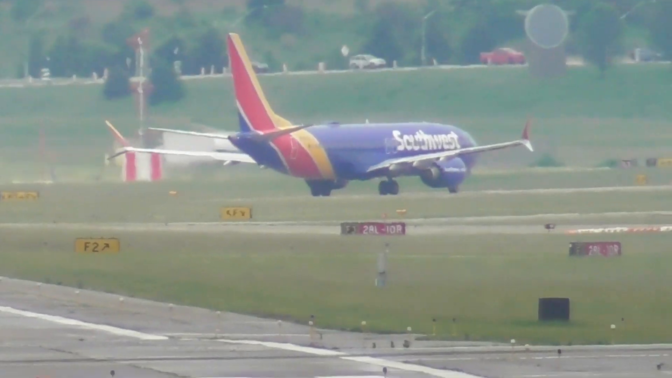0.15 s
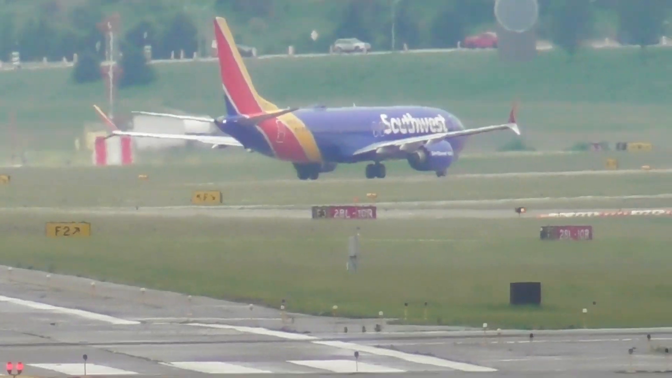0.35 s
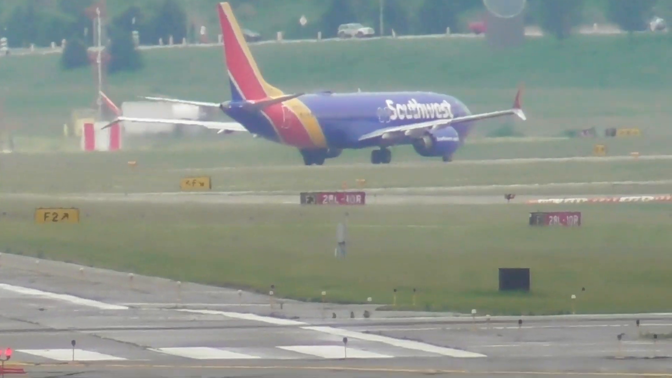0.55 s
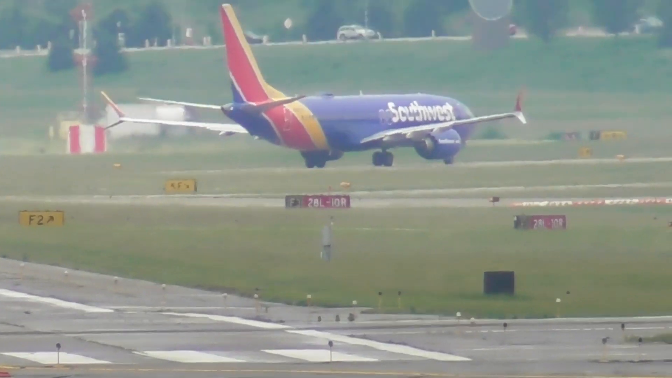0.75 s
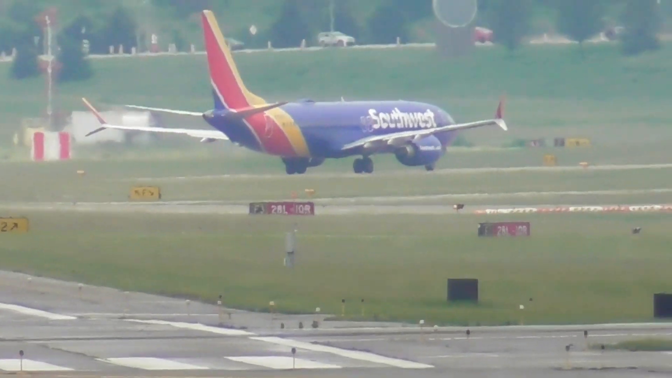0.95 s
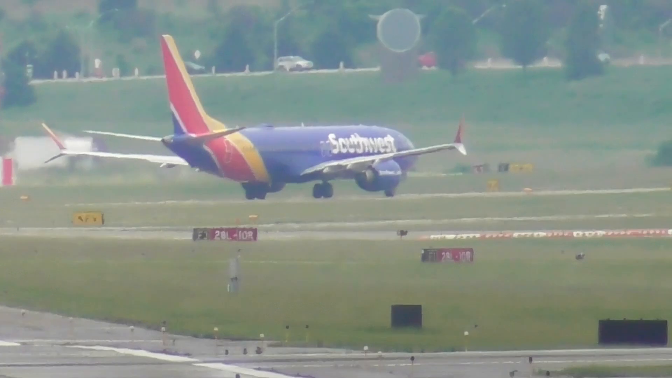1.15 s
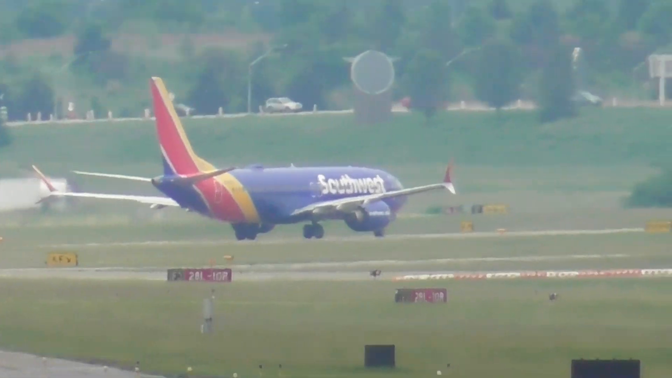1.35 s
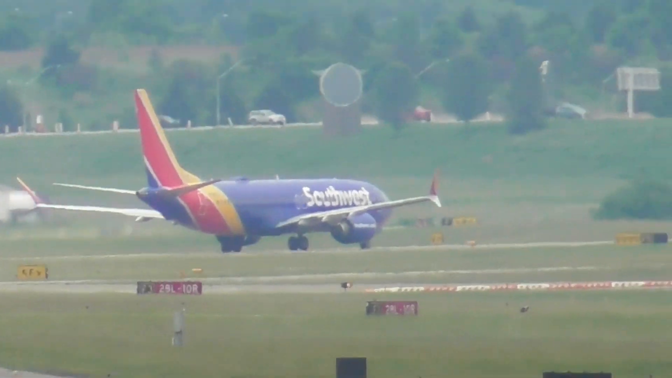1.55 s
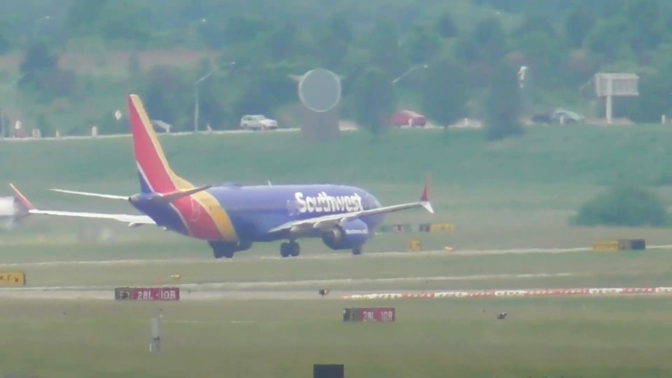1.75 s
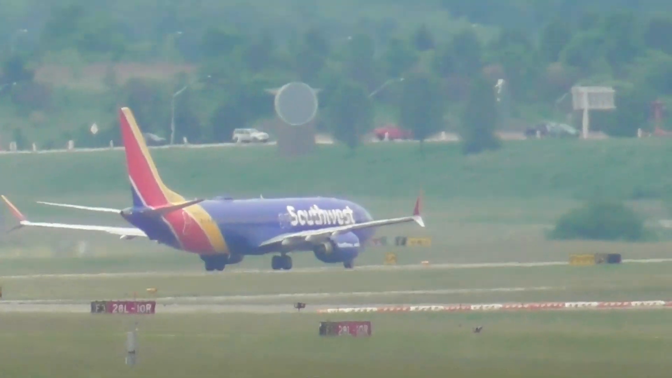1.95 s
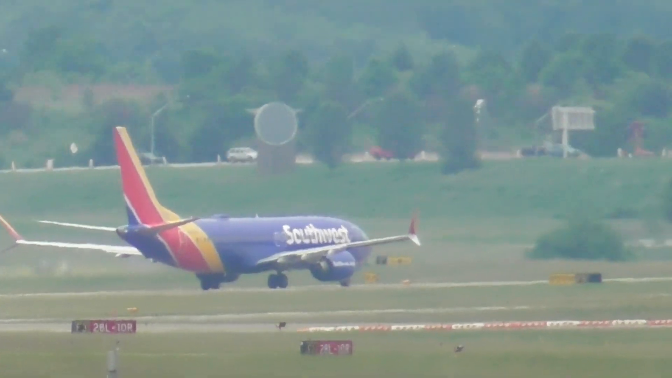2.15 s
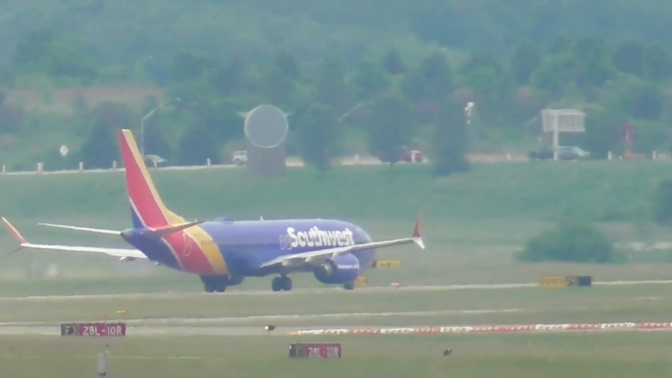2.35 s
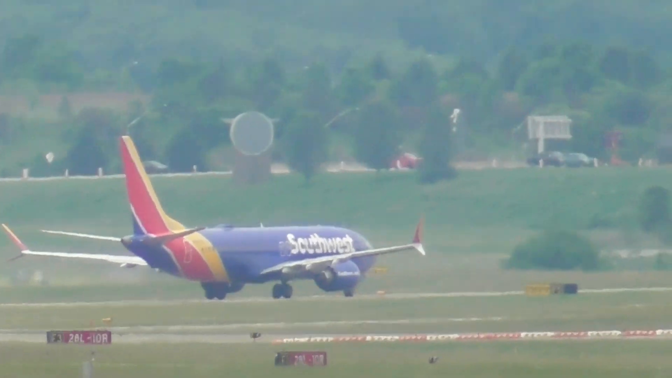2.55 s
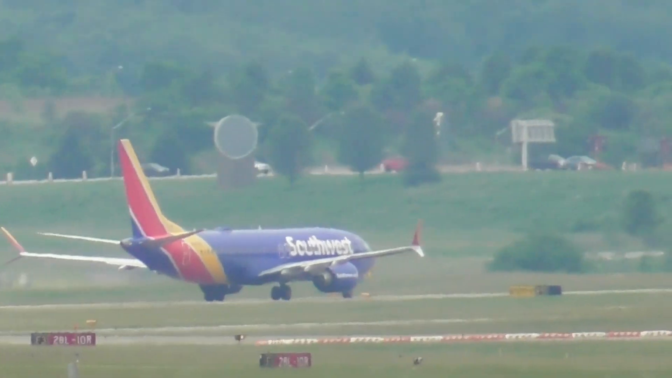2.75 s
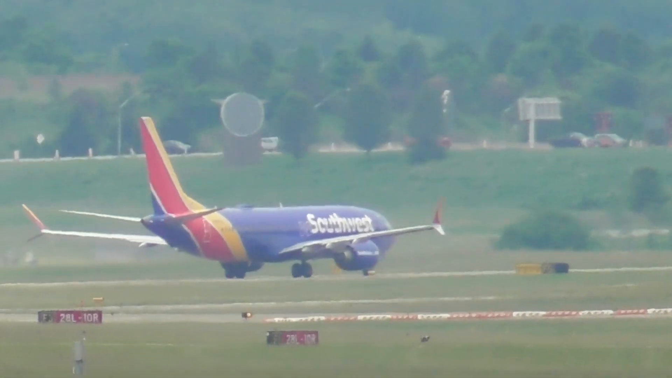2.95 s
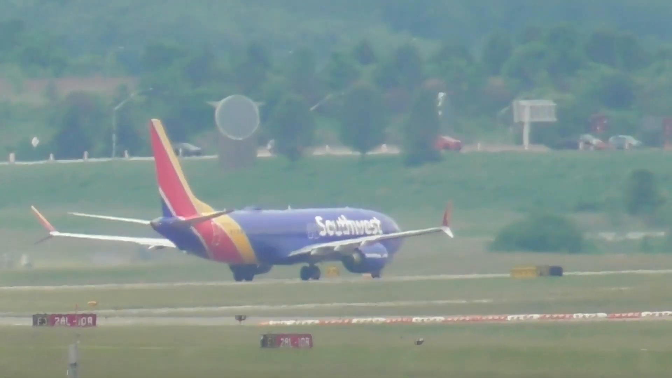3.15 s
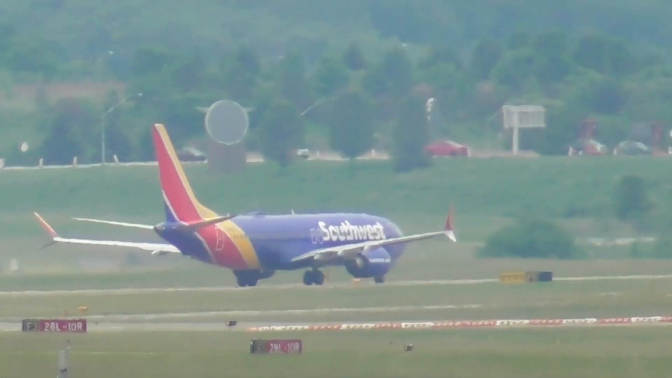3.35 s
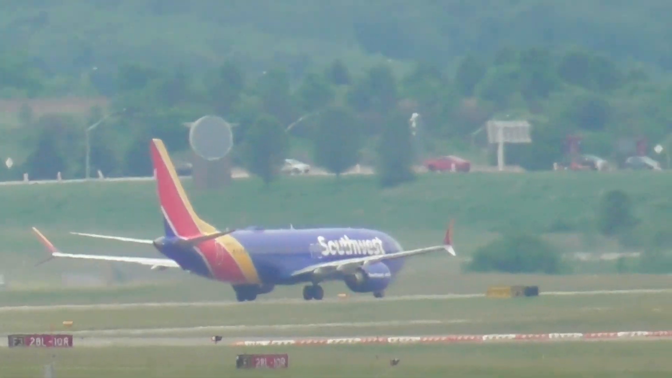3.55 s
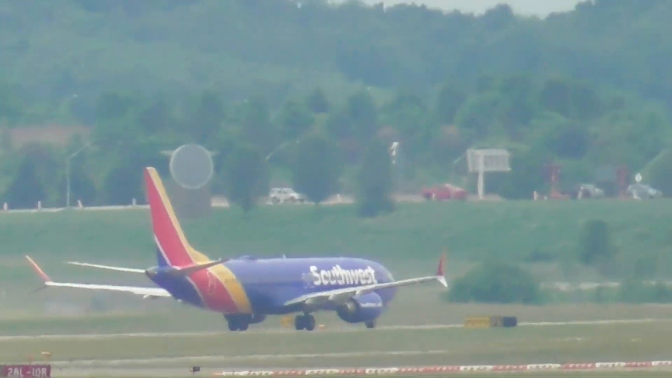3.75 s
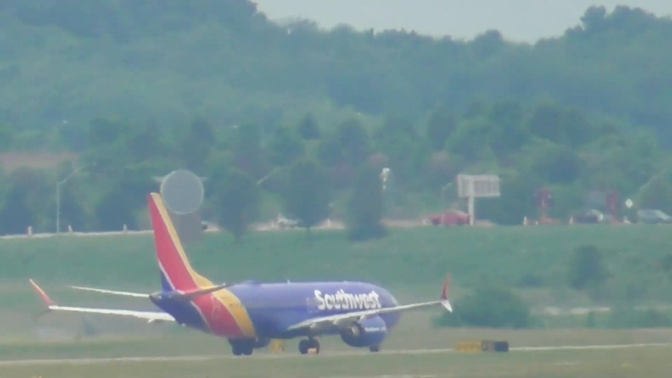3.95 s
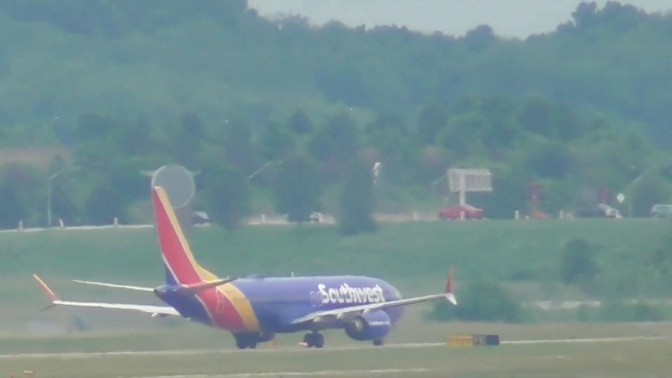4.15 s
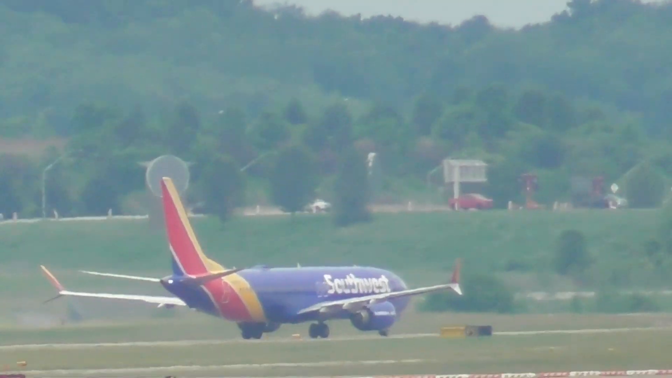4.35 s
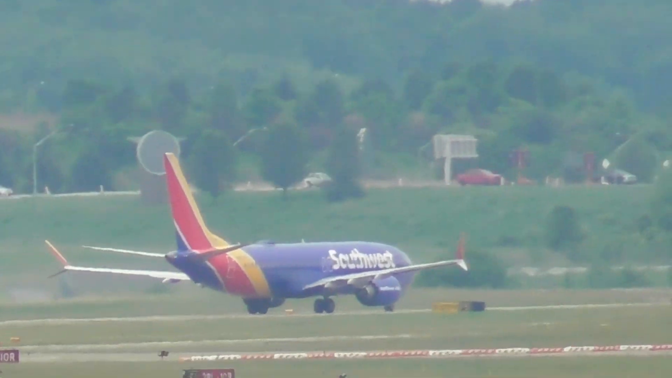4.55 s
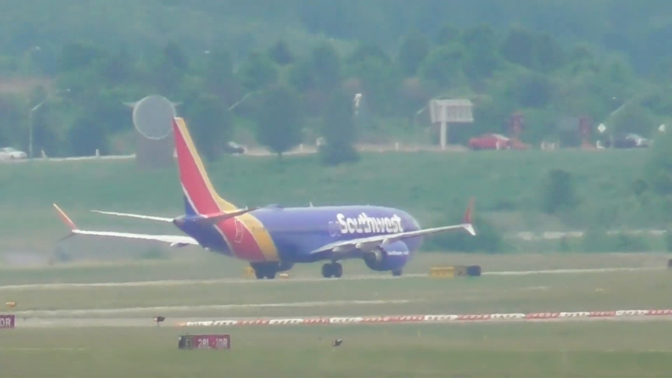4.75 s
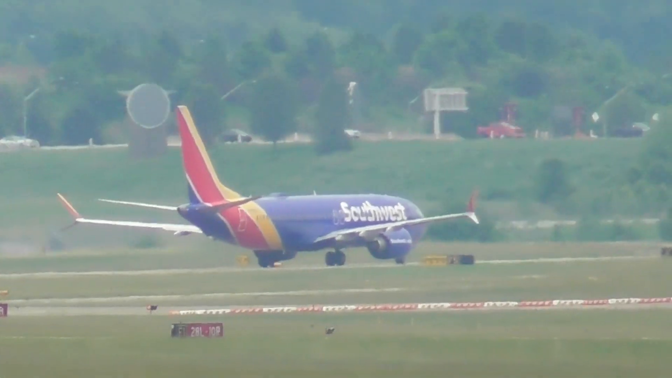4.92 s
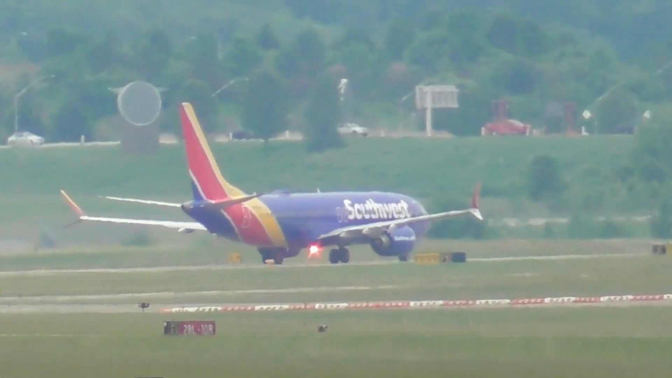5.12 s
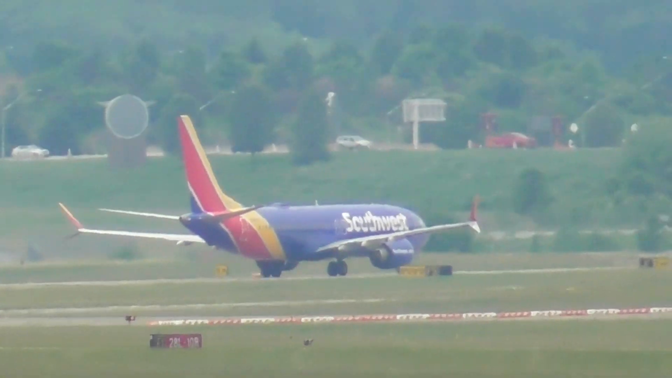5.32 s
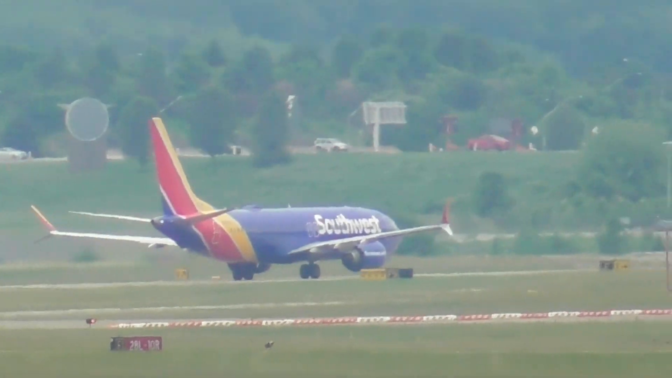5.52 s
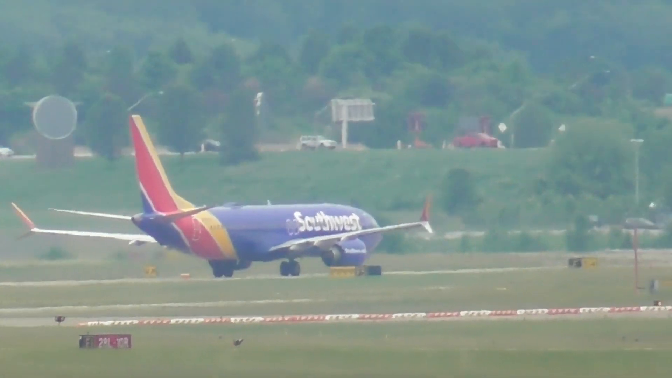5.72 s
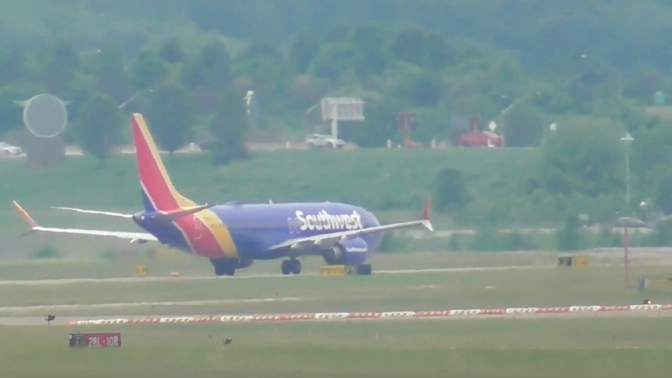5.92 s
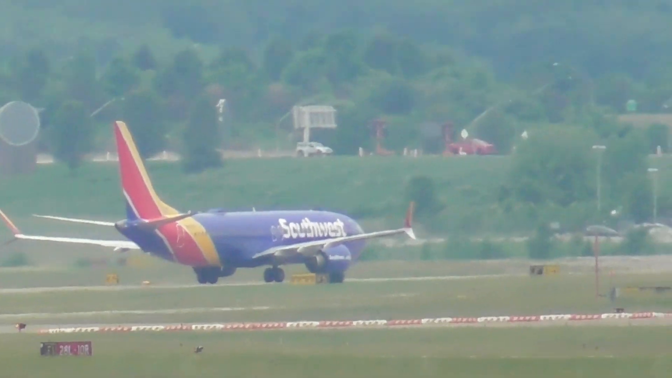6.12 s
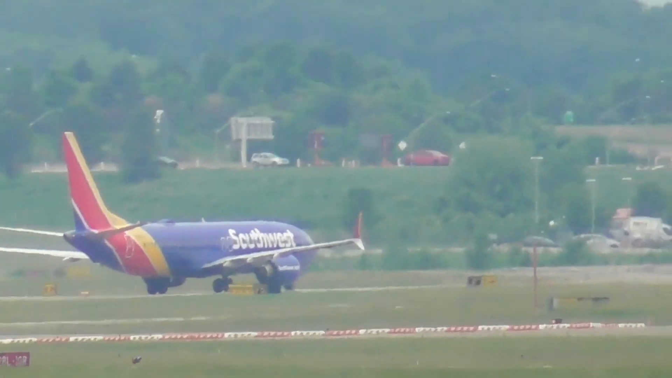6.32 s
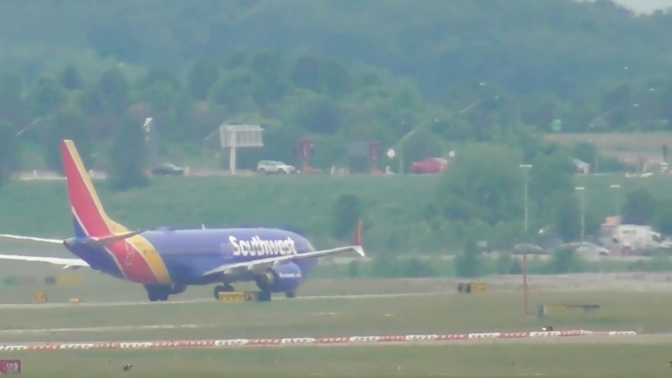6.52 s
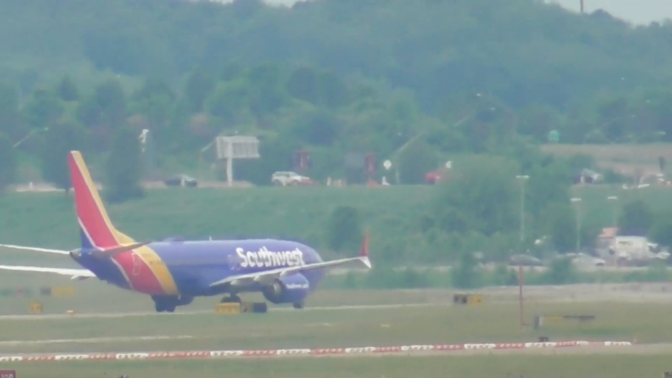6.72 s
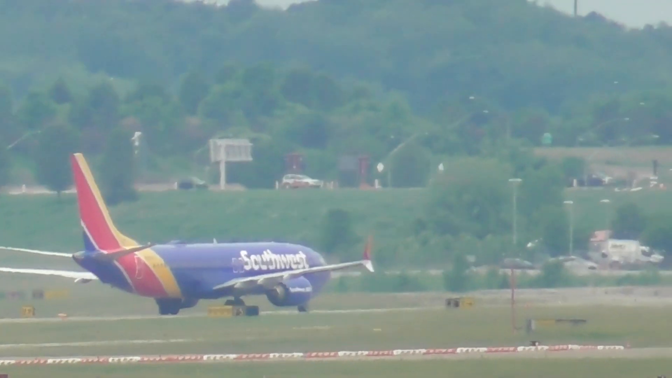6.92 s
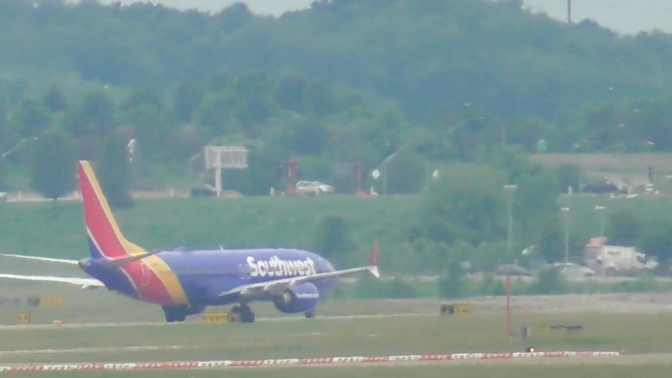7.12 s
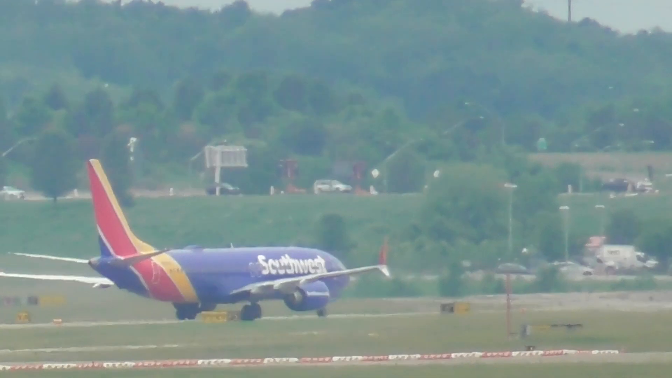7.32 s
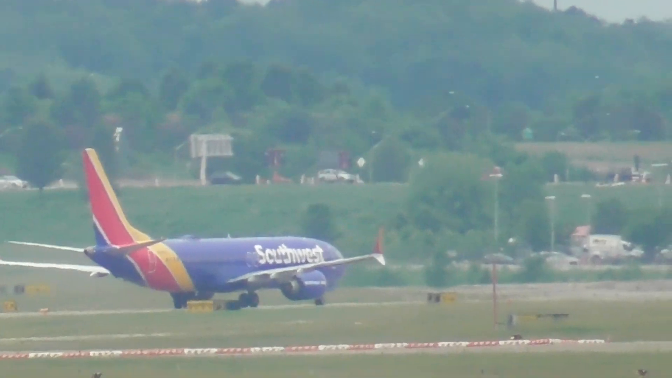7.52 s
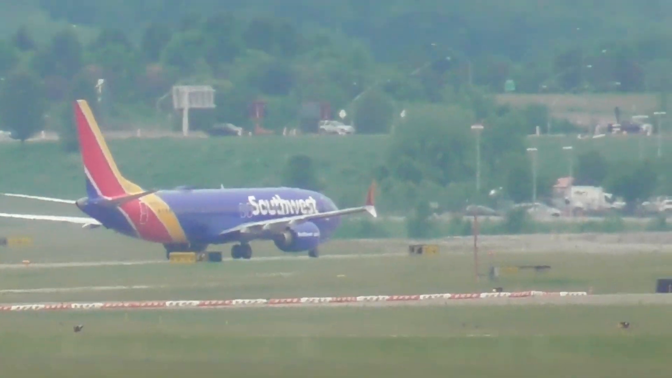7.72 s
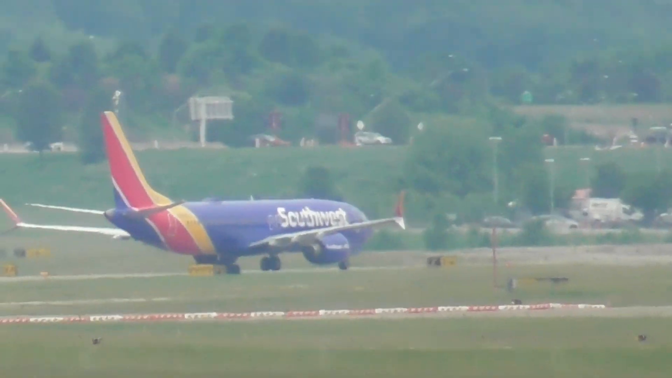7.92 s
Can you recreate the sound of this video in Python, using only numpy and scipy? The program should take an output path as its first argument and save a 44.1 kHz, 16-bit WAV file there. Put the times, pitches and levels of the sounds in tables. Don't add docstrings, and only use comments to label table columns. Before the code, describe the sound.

Handheld stereo camera in grass, far from a runway. A dull airfield hum and muffled jet rumble lie under a fast, bright cricket trill. Faint birds whistle, one button tick sounds near the start, and light grass rustle rises after three seconds. Harsh little bird rasps follow, then the engines' reversed exhaust swells to a wide, rushing roar that covers nearly everything and barely eases at the end.

```python
import sys
import numpy as np
from scipy import signal
from scipy.fft import rfft, irfft, next_fast_len
from scipy.io import wavfile
from scipy.ndimage import uniform_filter1d

SR = 44100
rng = np.random.default_rng(int(sys.argv[2]) if len(sys.argv) > 2 else 0)


def ratio_of_db(decibels):
    return 10 ** (np.asarray(decibels, float) / 20)


def log_audio(samples):
    frames = np.atleast_2d(samples).T
    limited = np.clip(frames, -1, 1)
    pcm = np.round(limited * 32767).astype(np.int16)
    wavfile.write(sys.argv[1], SR, pcm)


N = 351459
SECONDS = np.arange(N) / SR
OPPOSITE = np.array([[1], [-1]])


def level(x, db):
    return x * ratio_of_db(db) / np.sqrt(np.mean(x ** 2))


def on_log(hz, table_hz, values):
    return np.interp(np.log(hz + 1), np.log(table_hz), values)


def ramp(hz, low_hz, high_hz):
    return on_log(hz, [low_hz, high_hz], [0, 1])[:, None]


def step(t, at_s, width_s):
    return (1 + np.tanh((t - at_s) / width_s / 2)) / 2


def coloured(spectrum):
    hz, db = np.transpose(spectrum)
    size = next_fast_len(N)
    white = rfft(rng.standard_normal(size))
    gain = ratio_of_db(on_log(np.fft.rfftfreq(size, 1 / SR), hz, db))
    return level(irfft(white * gain, size)[:N], 0)


def walk(rate, count=N, per_s=SR):
    hold = max(int(per_s / rate), 1)
    held = np.repeat(rng.standard_normal(count // hold + 1), hold)
    smooth = uniform_filter1d(uniform_filter1d(held, hold), hold)[:count]
    return smooth / smooth.std()


def tone(hz):
    return np.sin(2 * np.pi * np.cumsum(hz) / SR)


# pitch in Hz, left minus right in dB facing the runway, the same turned away in dB, how far left leads in
LEFT_RIGHT_DIFFERENCES = [(70, 12, 11, -0.5, 0.83), (153, 11.5, 15.4, -0.6, 0.92), (304, 7, 14.4, -1.06, .95),
                          (600, 4.5, 13, -0.73, 0.95), (1130, -1.5, 12.4, -1.14, 0.91),
                          (2200, -6, 7.8, 0.22, 0.92), (3300, -0.5, 7.1, 0.1, 0.92), (4600, -7, 1.3, 0.46, 1),
                          (7300, -1, 0.3, -0.27, 0.99), (9000, -1, 0.5, 2, 0.84), (10900, 3, .3, 2.5, 1),
                          (12600, -2, .2, 4, 1), (15000, 0.2, .2, 3.14, .97)]


def far_noise(spectrum, gain_db, turned, patchy_db):
    window = 1024
    hz, s, direct = signal.stft(coloured(spectrum), SR, nperseg=window)
    scattered = signal.stft(coloured(spectrum), SR, nperseg=window)[2]

    centres_hz = np.geomspace(60, 12000, num=12)
    patches = np.array([walk(5.0, count=len(s), per_s=SR / 512) for _ in centres_hz])
    patches = np.array([on_log(hz, centres_hz, moment) for moment in patches.T]).T
    gain = ratio_of_db(gain_db(hz, s) + patchy_db * patches)

    port_hz, *columns = np.transpose(LEFT_RIGHT_DIFFERENCES)
    facing_db, away_db, lead, like = (on_log(hz, port_hz, column)[:, None] for column in columns)
    tilt = ratio_of_db(facing_db + turned(s) * (away_db - facing_db))
    like = np.clip(like, 0, 1)
    left = direct * np.exp(1j * lead) * tilt / (1 + tilt)
    right = (like * direct + np.sqrt(1 - like ** 2) * scattered) / (1 + tilt)
    return signal.istft(2 * gain * np.array([left, right]), SR, nperseg=window)[1][:, :N]


# pitch in Hz, level in dB per Hz.
HISS_SPECTRUM = [(2000, 3), (3800, 0), (5500, -1), (6400, -5), (8000, -1.5), (11000, -3), (15500, -1)]


def port_hiss():
    hiss_db, duck_from_s, duck_db_per_s = -65, 6.95, -5
    common, apart = coloured(HISS_SPECTRUM), coloured(HISS_SPECTRUM)
    loud_for_s = np.maximum(SECONDS - duck_from_s, 0)
    return ratio_of_db(hiss_db + duck_db_per_s * loud_for_s) * (common + 0.64 * apart * OPPOSITE)


# pitch in Hz, level in dB per Hz.
AIRFIELD_SPECTRUM = [(15, -37), (25, -17), (104, 5), (139, -7), (211, -3.5), (421, -26), (457, -7),
                     (912, -8.5), (1380, -32), (1710, -18), (3700, -33.5), (4810, -17), (8140, -120)]


def airfield():
    return far_noise(AIRFIELD_SPECTRUM, lambda hz, t: -44, lambda t: 0, patchy_db=1.1)


def breeze():
    calm_db, gust_db, gust_s, rise_s = -82, -60.5, 3.15, 0.4
    rustle = coloured([(3800, -35), (5000, -2.0), (6000, 0.0), (7500, -7.0), (9500, -16), (12000, -16)])
    gust = (gust_db - calm_db) * step(SECONDS, gust_s, rise_s)
    return rustle * ratio_of_db(calm_db + gust + 0.9 * walk(5.1))


# pitch in Hz, level in dB per Hz.
CHORUS_SPECTRUM = [(3500, -40), (4000, -20), (4300, -2.5), (4450, 3.5), (4620, -13), (4750, -11.5),
                   (5100, -37), (5500, -70)]


def cricket_chorus():
    chorus_db, overtone_db, third_db = -49, -14, -15
    apart = 0.26
    above = [(2 * hz, db) for hz, db in CHORUS_SPECTRUM]
    above += [(3 * hz, db + third_db) for hz, db in CHORUS_SPECTRUM[1:]]
    overtones = coloured(above) + apart * coloured(above) * OPPOSITE
    return ratio_of_db(chorus_db) * coloured(CHORUS_SPECTRUM) + ratio_of_db(chorus_db + overtone_db) * overtones


# wing strokes per second, share of a stroke cycle gone at the start,
# pitch in Hz as a stroke begins, level in dB, left minus right of the octave in dB.
CRICKET_SINGERS = [
    (30.8, .92, 4510, -42, -10),
    (30.6, .4, 4480, -54, -6),
    (31.2, .6, 4495, -58, -6),
    (29.7, .1, 4470, -59, 2),
]


def crickets():
    out = np.zeros((2, N))
    for rate, start, hz, db, pan_db in CRICKET_SINGERS:
        cycle = start + np.cumsum(rate * (1 + .002 * walk(3.0))) / SR
        stroke = np.minimum(cycle % 1 / .6, 1)
        pitch_chance, level_chance = rng.standard_normal((300, 2))[cycle.astype(int)].T
        fall = (1 - np.cos(np.pi * stroke)) / 2
        bend = 1 - .06 * fall + .003 * pitch_chance + .004 * walk(700)
        phase = 2 * np.pi * np.cumsum(hz * bend) / SR
        push = ratio_of_db(db + 1.2 * level_chance + 1.6 * walk(300)) * np.sin(np.pi * stroke ** .75) ** .6

        main = ratio_of_db(-7 * fall - 1.5 * OPPOSITE) * np.sin(phase)
        right_shift = np.array([[0], [6 * rng.random()]])
        octave = ratio_of_db(-10 - 7 * fall + pan_db * OPPOSITE / 2) * np.sin(2 * phase + right_shift)
        twelfth = ratio_of_db(-26 - 10 * fall) * np.sin(3 * phase) * np.array([[1.8], [.15]])
        out += push * (main + octave + twelfth)
    return out


# start in seconds, length in seconds, first pitch in Hz, last pitch in Hz,
# level in dB.
STRAIGHT_WHISTLES = [(.11, .02, 3700, 3100, -68), (.235, .044, 3200, 2700, -61),
                     (.445, .03, 3400, 2750, -61), (.6, .03, 3570, 2920, -72), (.8, .07, 2100, 2430, -63),
                     (1.02, 0.055, 2800, 3300, -64), (1.15, .03, 2200, 2550, -62),
                     (1.29, .04, 3300, 2950, -64), (1.395, .035, 7350, 6300, -74),
                     (2.33, .02, 3300, 2900, -67), (2.347, .03, 2580, 2680, -60),
                     (2.598, .03, 3300, 3600, -63), (2.67, .03, 3600, 3200, -71),
                     (2.845, .07, 7150, 7140, -70), (3.275, .06, 7120, 7080, -68),
                     (3.61, 0.028, 2480, 2440, -56), (4.684, .036, 6100, 7900, -53),
                     (5.64, .065, 3530, 3400, -58)]
# start in seconds, length in seconds, pitch at both ends in Hz,
# pitch in the middle in Hz, level in dB.
BENT_WHISTLES = [
    (.465, .076, 2720, 2580, -56.5),
    (.68, .07, 2360, 2460, -60),
    (0.852, .12, 2290, 3050, -59),
    (1.625, .09, 3000, 4000, -59),
    (2.15, .04, 3300, 3900, -64),
]
# start in seconds, pitch in Hz, level in dB.
RISING_PIPS = [(4.661, 6000, -55), (4.84, 6600, -55), (5.014, 6150, -53), (5.047, 6600, -51),
               (5.18, 6000, -55.5), (5.204, 6200, -48), (5.208, 7250, -62), (5.218, 6850, -63),
               (5.332, 6250, -58), (5.342, 7050, -63), (5.4, 6200, -57), (5.513, 6600, -55),
               (4.84, 3300, -57), (5.21, 3300, -53), (5.3, 3300, -58), (5.36, 3220, -57),
               (5.515, 3250, -55)]


def birds():
    pip_s, pip_rise = .021, 0.021
    calls = []
    for s, length, first, last, db in STRAIGHT_WHISTLES:
        calls.append((s, length, (first + last) / 2, (last - first) / 2, 0, db))
    for s, length, ends, middle, db in BENT_WHISTLES:
        calls.append((s, length, middle, 0, ends - middle, db))
    for s, hz, db in RISING_PIPS:
        calls.append((s, pip_s, hz, hz * pip_rise / 2, 0, db))

    out = np.zeros(N)
    for s, length, middle_hz, slope_hz, bend_hz, db in calls:
        u = np.linspace(-1, 1, int(length * SR))
        swell = np.sqrt(2 * (1 - u ** 2))
        out[int(s * SR):][:len(u)] += ratio_of_db(db) * swell * tone(middle_hz + u * slope_hz + u ** 2 * bend_hz)
    return out * ratio_of_db(2.0 * walk(120.))


# start in seconds, length in seconds, level in dB.
RASP_CALLS = [(.39, .04, -68), (1.09, 0.052, -64), (2.14, .06, -62), (2.28, 0.087, -68),
              (3.957, 0.083, -55), (4.662, 0.11, -50.5), (4.815, 0.09, -51.5), (5.02, .1, -52.5),
              (5.18, 0.088, -51), (5.345, 0.1, -53.5), (5.487, 0.099, -55.5)]


def rasps():
    breath = coloured([(1500, -34), (3300, 3.5), (4800, -12), (6000, 0.5), (7800, 2), (10000, -18),
                       (14000, -30)])
    flutter = ratio_of_db(2.5 * walk(250.))
    swells = np.zeros(N)
    for s, length, db in RASP_CALLS:
        swells += ratio_of_db(db) * np.exp(-((SECONDS - s - length / 2) / (.5 * length)) ** 2)
    return breath * flutter * swells


def click():
    click_s, click_db = .3343, -30
    t = np.arange(400) / SR
    body = np.sin(2 * np.pi * 950 * t) * np.exp(-t / 0.0028)
    snap = rng.standard_normal(400) * np.exp(-t / .0012) * ratio_of_db(-2.5)
    snap = signal.lfilter(*signal.butter(4, 9500, fs=SR), snap)
    out = np.zeros(N)
    out[int(click_s * SR):][:400] = ratio_of_db(click_db) * (body + snap)
    return out


# time in seconds, thrust in dB below full, clearness of the air in dB.
JET_COURSE = [(0, -22.5, 4.5), (.5, -22.5, 1.5), (1.7, -21, -6), (2.9, -20, -4), (3.5, -18, -1),
              (4, -16.5, 2), (5, -12.5, -2), (5.8, -8.5, -3.5), (6.5, -4.5, -3), (6.95, -3, -3.5),
              (7.2, -1.5, 0.5), (7.57, 0.5, 0.5), (7.97, -1.5, 1)]
# pitch in Hz, level in dB per Hz.
ROAR_SPECTRUM = [(20, -24), (42, -6), (60, -4.5), (209, -1.5), (600, -10), (790, -7.5), (945, -4.5),
                 (1270, -12), (2060, -13), (3900, -26), (5300, -30), (7300, -25.5), (9900, -31),
                 (12600, -40), (15500, -47)]


def jet():
    roar_db, drone_db, hum_db = -24.5, -14, -21
    bass_share, hum_share = 0.65, 0.54
    course_s, thrust_db, clear_db = np.transpose(JET_COURSE)
    thrust = np.interp(SECONDS, course_s, thrust_db)

    def turned(t):
        return step(t, 6.93, 0.12)

    def gain_db(hz, t):
        follow = bass_share + (1 - bass_share) * ramp(hz, 131, 730)
        push = np.interp(t, course_s, thrust_db) * follow
        air = np.interp(t, course_s, clear_db) * ramp(hz, 1000, 2000)
        shade = -6.5 * (1 - turned(t)) * ramp(hz, 1970, 3400)
        edge = -6 * (1 - step(t, 7.33, 0.21)) * ramp(hz, 4200, 6500)
        return roar_db + push + air + shade + edge

    drone = tone(40 + 2.914 * walk(6.5))
    drone = drone * ratio_of_db(roar_db + drone_db + bass_share * thrust + 2.0 * walk(3))
    hum = tone(1010 + 7 * thrust + 45.07 * walk(90.))
    hum = hum * ratio_of_db(roar_db + hum_db + hum_share * thrust + 4.0 * walk(60.))
    roar = far_noise(ROAR_SPECTRUM, gain_db, turned, patchy_db=1.6)
    return roar + drone * np.array([[1.6], [.4]]) + hum * np.array([[1.2], [.8]])


def scene():
    return airfield() + breeze() + cricket_chorus() + crickets() + birds() + rasps() + click() + jet()


def band_limit(x):
    return signal.sosfilt(signal.butter(12, 15710, fs=SR, output="sos"), x)


def record(dry):
    mix = dry + port_hiss()
    return band_limit(mix)


dry = scene()
out = record(dry)
log_audio(out)
```